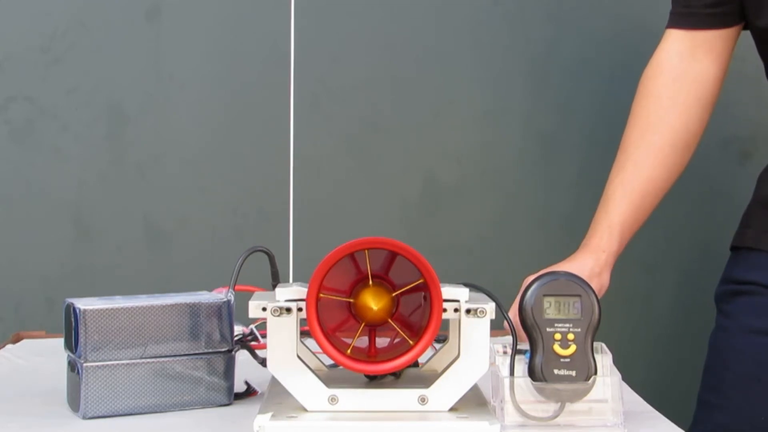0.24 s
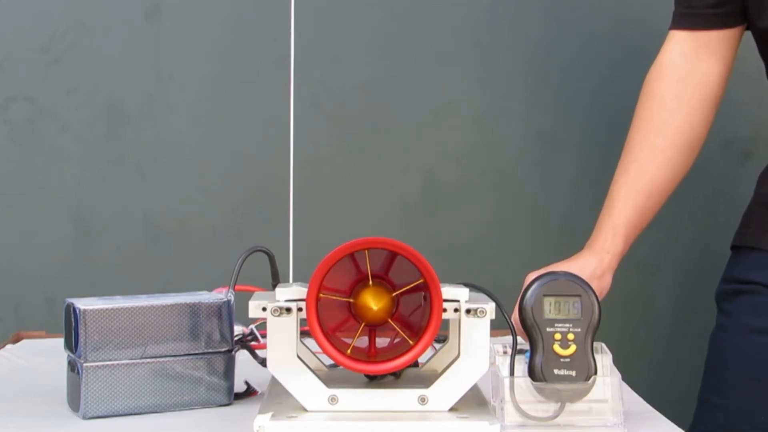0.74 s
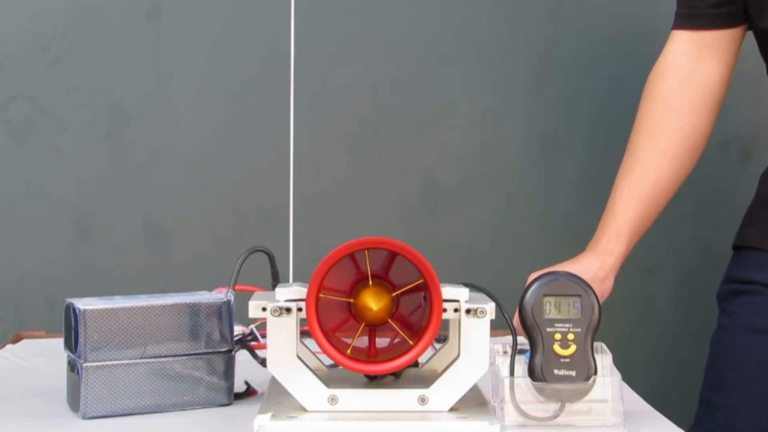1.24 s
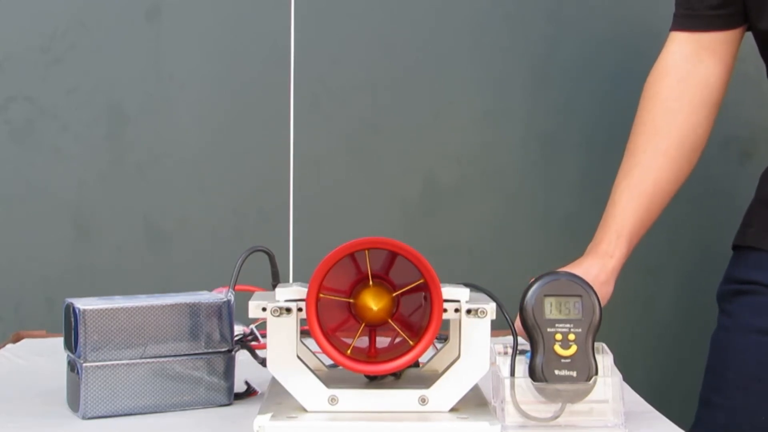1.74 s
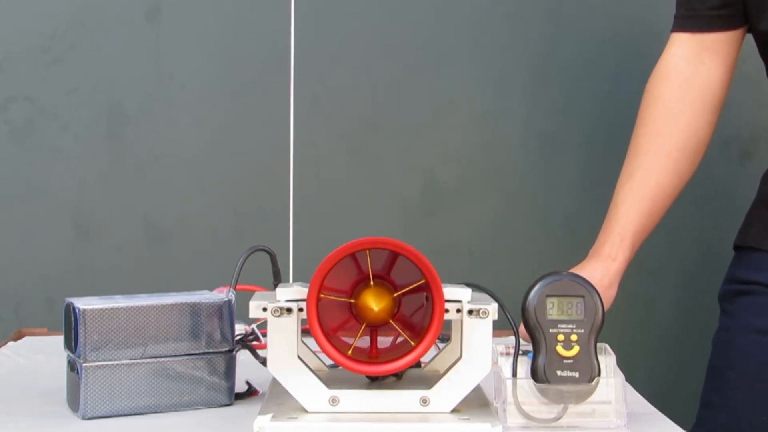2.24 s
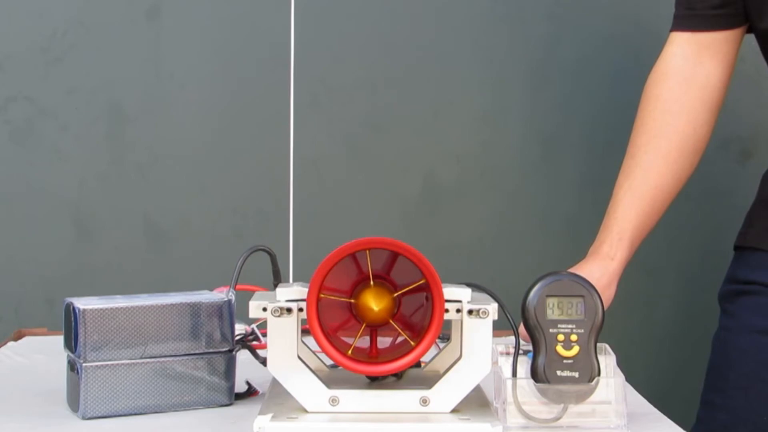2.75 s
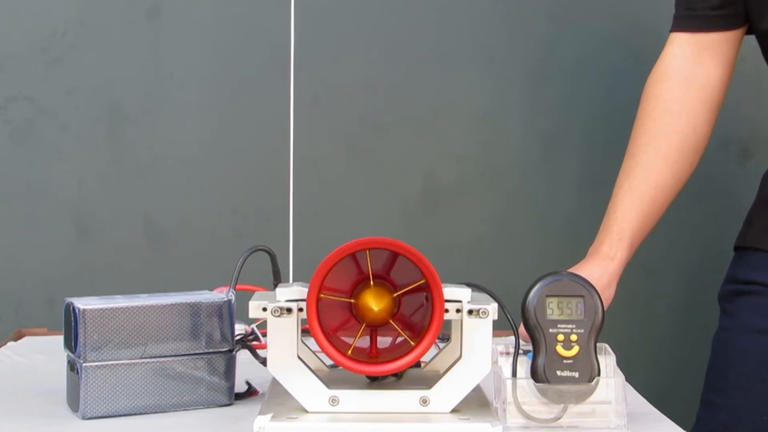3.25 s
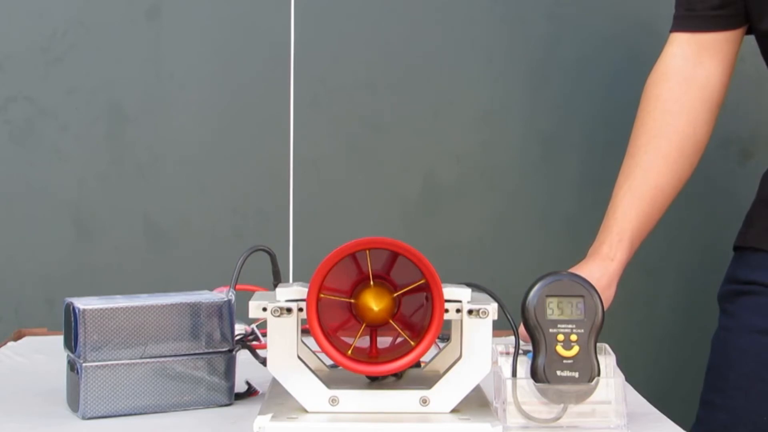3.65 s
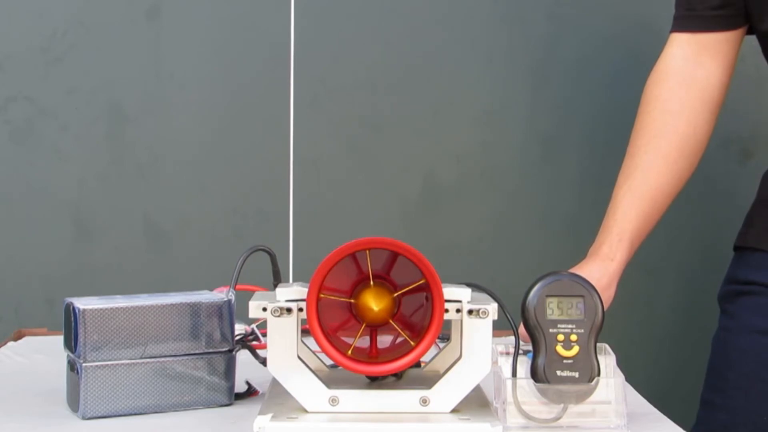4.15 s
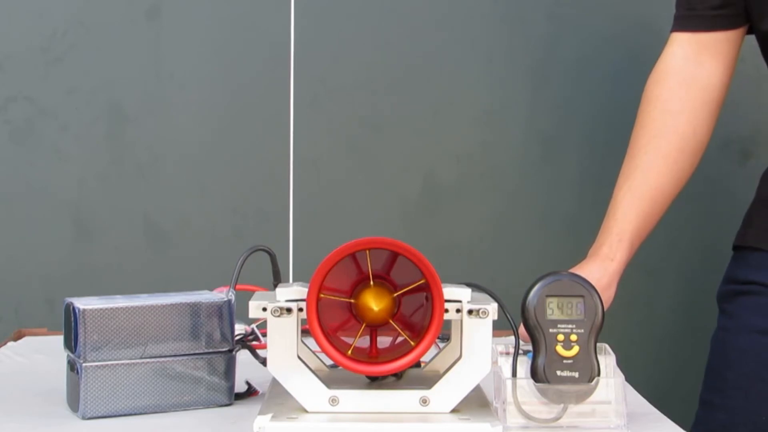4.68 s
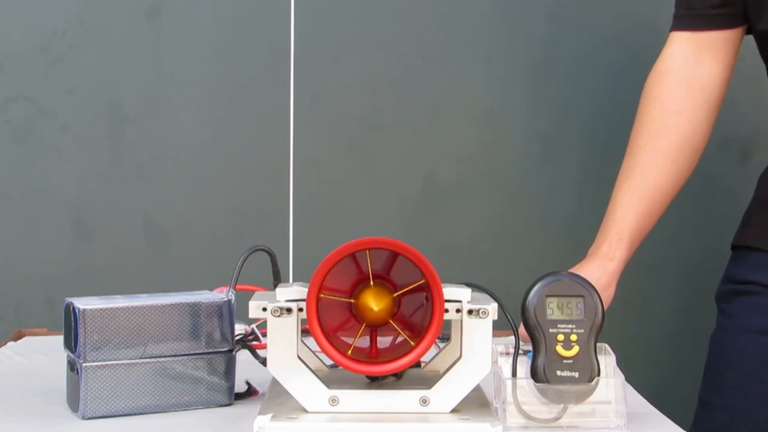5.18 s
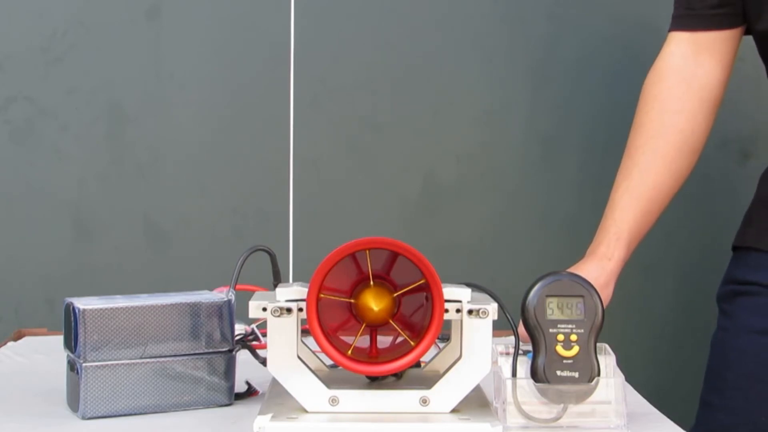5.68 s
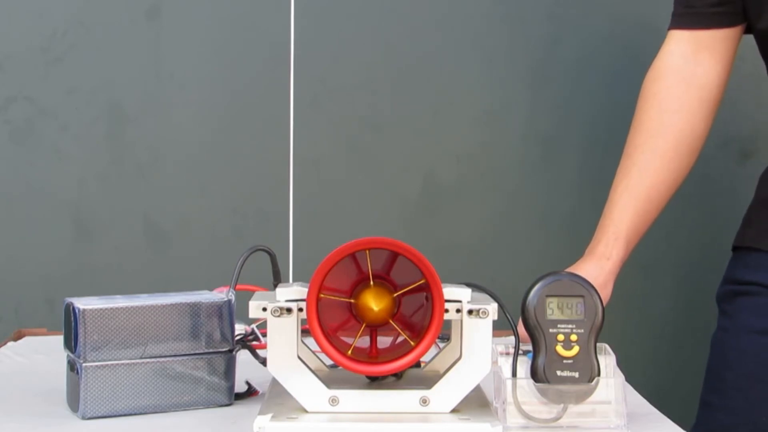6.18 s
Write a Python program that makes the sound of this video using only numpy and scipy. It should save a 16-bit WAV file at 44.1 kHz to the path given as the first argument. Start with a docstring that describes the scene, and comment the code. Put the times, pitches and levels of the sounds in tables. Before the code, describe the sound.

A ducted fan on a bench stand starts with a quiet, sinking whine and soft hissing air. Just after half a second it is throttled up: the whine climbs steeply, a thin controller whistle appears, and the air roar swells. From about two seconds it holds a shrill, very slightly sagging tone that swells and fades to the end. Close stereo microphone in a small, lively room.

```python
"""A whine sinks, climbs steeply and holds high over rushing air: a twelve-blade electric ducted fan on a
test stand coasts down, is throttled up and held at full power. One shaft speed drives blade harmonics,
shaft orders, stand resonances and the level and colour of filtered-noise air. The speed controller whistles.
Room echoes make the gliding tones flutter; the held whine swells and fades in the moving air."""
import sys
import numpy as np
from scipy import signal
from scipy.fft import rfft, irfft, next_fast_len
from scipy.io import wavfile
from scipy.ndimage import uniform_filter1d

SR = 44100
rng = np.random.default_rng(int(sys.argv[2]) if len(sys.argv) > 2 else 0)


def bounce(signal):
    """Save signal as a 16-bit WAV file at the path given by the first command-line argument."""
    frames = np.transpose(np.atleast_2d(signal))
    limited = np.clip(frames, -1, 1)
    pcm = np.round(limited * 32767).astype(np.int16)
    wavfile.write(sys.argv[1], SR, pcm)


N = 283116
TIME = np.arange(N) / SR
BLADE_COUNT = 12


def amp(db):
    """Decibels to gain."""
    return 10 ** (np.asarray(db) / 20)


def evened(x):
    """Scales to rms 1."""
    return x / np.sqrt(np.mean(abs(x) ** 2) + 1e-20)


def follow(rows, t=TIME):
    """Columns of a curve table, interpolated at the times t."""
    s, *columns = np.transpose(rows)
    return [np.interp(t, s, c) for c in columns]


def read(points, hz):
    """Spectrum table interpolated on a log-frequency axis."""
    f, value = np.transpose(points)
    return np.interp(np.log(hz + 1), np.log(f + 1), value)


def resonance(hz, centre_hz, width_hz):
    """Bell-shaped response, 1 at the centre and 1/2 at half the width to either side."""
    return 1 / (1 + (2 * (hz - centre_hz) / width_hz) ** 2)


def bumps(rows, hz):
    """Summed dB of bell-shaped peaks or dips."""
    return sum(db * resonance(hz, f, width) for f, width, db in rows)


def wander(rate_hz, slope=2):
    """Complex random drift of rms 1 that falls off above the given rate."""
    size = next_fast_len(N, real=True)
    hz = np.fft.rfftfreq(size, 1 / SR)
    spectrum = rfft(rng.standard_normal((2, size)))
    lowpass = 1 / np.sqrt(1 + (hz / rate_hz) ** (2 * slope))
    a, b = irfft(spectrum * lowpass, size)[:, :N]
    return evened(a + 1j * b)


def eddies(rate_hz, apart, slope=2):
    """Drift at two microphones: a shared part plus each one's own, weighted by apart."""
    own = np.array([wander(rate_hz, slope), wander(rate_hz, slope)])
    return evened(wander(rate_hz, slope) + apart * own)


def tone(turns, db, drift=1):
    """Sine of the given rms level before a complex drift shakes it."""
    return np.sqrt(2) * amp(db) * (drift * np.exp(2j * np.pi * turns)).real


# DRAG_PER_TURN: share of the speed lost to air drag in each turn
COAST_RPS, DRAG_PER_TURN = 261, .00713
# full-power battery sag: quick drop with its time constant, then steady loss
SAG_RPS, SAG_S, DRAIN_RPS_PER_S = 3.25, .33, 1.6
# throttle opening, before smoothing: (time [s], shaft speed [turns/s])
SPIN_UP_RPS = [(.6, 124.5), (.65, 131), (.7, 151), (.8, 215.9), (.91, 307), (1, 363.5), (1.1, 406.4),
               (1.3, 482), (1.5, 528), (1.9, 620), (2.02, 673), (2.11, 697.3)]


def shaft_speed():
    """Turns per second: drag slows the rotor, the throttle winds it up, the battery sags under load."""
    coasting = COAST_RPS / (1 + DRAG_PER_TURN * COAST_RPS * TIME)
    loaded_s = np.maximum(TIME - SPIN_UP_RPS[-1][0], 0)
    sag_rps = SAG_RPS * (1 - np.exp(-loaded_s / SAG_S)) + DRAIN_RPS_PER_S * loaded_s
    driven = follow(SPIN_UP_RPS)[0] - sag_rps
    return uniform_filter1d(np.maximum(coasting, driven), size=1400, mode="nearest")


KNEE_RPS, RUSH_DB_PER_RPS = 358, .078
SURGE_AT_S, SURGE_RISE_S, SURGE_FALL_S, SURGE_DB = 1.81, 0.12, 1.16, 2.5


def airflow(shaft_hz):
    """Flow in dB re steady full power: rises with speed up to a knee, surges once at the throttle stop."""
    since = np.maximum(TIME - SURGE_AT_S, 0)
    fall = np.exp(-np.maximum(since - SURGE_RISE_S, 0) / SURGE_FALL_S)
    surge = np.minimum(since / SURGE_RISE_S, 1) * fall
    return RUSH_DB_PER_RPS * np.minimum(shaft_hz - KNEE_RPS, 0) + SURGE_DB * surge


# blade harmonics 1 to 8, before duct lift: (level above the knee [dB], gain per dB of flow [dB/dB])
BLADE_HARMONICS = [(-21, 1.45), (-17.5, 1.6), (-19, 1.5), (-26, 1.5), (-27, 1.4), (-37, 1.15), (-34, 1.15),
                   (-41, 1.05)]
# duct and stand resonances, unscaled: (frequency [Hz], width [Hz], lift [dB])
DUCT_RESONANCES = [(208, 39, 4.5), (590, 28, 1.5), (704, 62, 6), (980, 82, 3), (1280, 120, 2),
                   (1404, 63, 9), (1744, 30, 3.5), (2416, 58, 4.5), (2707, 195, 4)]


def gliding_whine(turns, shaft_hz, flow_db, coloured=.9):
    """Blade harmonics grow with flow and swell at duct resonances; turbulence makes each tremble."""
    out = np.zeros((2, N))
    for k, (db, growth) in enumerate(BLADE_HARMONICS, 1):
        order = k * BLADE_COUNT
        lift_db = coloured * bumps(DUCT_RESONANCES, order * shaft_hz)
        level_db = db + growth * np.minimum(flow_db, 0) + lift_db
        tremble = .25 * eddies(90, .5, slope=1.4)
        audible = order * shaft_hz < SR / 2
        out += audible * tone(order * turns, level_db, 1 + tremble)
    return out


# full-power whine, before trim and fading: (time [s], level [dB], left minus right [dB])
HELD_WHINE = [(2.1, -18, 5), (2.16, -21.5, 0.0), (2.28, -21.5, 2.5), (2.33, -25.5, 13), (2.41, -16.5, 4),
              (2.58, -20, 3.0), (2.64, -25, 9), (2.69, -17.5, 3), (2.76, -25, 0.0), (2.8, -17.5, -0.5),
              (2.93, -18, 2.0), (3.01, -22, -0.5), (3.12, -15.5, -2), (3.29, -16.5, -1.0),
              (3.41, -17.5, -6.5), (3.61, -22.5, -9), (3.7, -26.5, -3), (3.75, -22.5, -13),
              (3.84, -20.5, 0.0), (3.95, -28.5, -7), (4.0, -21, -3), (4.44, -19.5, 0.5), (4.65, -16, -1),
              (4.83, -23, 2.5), (4.88, -18.5, 3), (5.5, -17, -1.5), (5.88, -16.5, 1.0), (5.95, -20, 0.0),
              (6.07, -15, -1), (6.22, -17.5, 0), (6.27, -23, -0.5), (6.42, -16, -2.0)]


def held_whine(turns, trim_db=2, fray=0.24, spread=1.0, lag_rad=0.1):
    """Blade tone at full power: swells, fades at random, trembles, sits in a narrow noise skirt."""
    db, pan_db = follow(HELD_WHINE)
    sides = np.array([[1], [-1]])
    fading = .2 * eddies(12, .9) + .14 * eddies(35, .9)
    # slightly out of phase at the two microphones
    drift = np.exp(1j * lag_rad * sides) * (1 + fading)
    blade_turns = BLADE_COUNT * turns
    core = tone(blade_turns, db + trim_db + spread * sides * pan_db / 2, drift)
    skirt = tone(blade_turns, np.median(db) + trim_db, fray * eddies(96, 1.0, slope=1.25))
    return core + skirt


CONVERTER_HZ = 48000
FOLD_CENTRE_HZ, FOLD_WIDTH_HZ = 4200, 3400  # band that passes best
# folded blade harmonics, before flow, band and flutter: (harmonic number, level [dB])
FOLDED_HARMONICS = [(5, -39), (6, -35), (7, -35)]


def folded_whine(turns, shaft_hz, flow_db, flutter=0.47):
    """Faint whistles: ultrasonic blade harmonics mirrored by the converter, at |rate - harmonic|."""
    out = np.zeros((2, N))
    for k, db in FOLDED_HARMONICS:
        order = k * BLADE_COUNT
        mirrored_hz = abs(CONVERTER_HZ - order * shaft_hz)
        passed = resonance(mirrored_hz, FOLD_CENTRE_HZ, FOLD_WIDTH_HZ)
        drift = 0.74 + flutter * eddies(6, 0.46)
        out += passed * tone(CONVERTER_HZ * TIME - order * turns, db + flow_db, drift)
    return out


RUSH_DB = -27.8  # before flow and flicker
# rush colour, idling: (frequency [Hz], density [dB per Hz])
IDLE_COLOUR = [(25, -20), (100, -13.5), (170, -15.5), (300, -11), (1150, -6.5), (1330, -4), (2400, 5),
               (3500, -0.5), (4300, -3.5), (6500, -3), (9000, -8), (15000, -3)]
# rush colour, full power: (frequency [Hz], density [dB per Hz])
FULL_COLOUR = [(25, -24), (70, -15.5), (150, -4.5), (220, -4), (300, -6.5), (500, -4), (1100, -4.5),
               (1800, -0.5), (2700, 0), (3500, 0), (5000, -2), (7300, -3.5), (9500, -5), (15000, -5.5)]
# jet swirl in the room, out of step at the two microphones: (frequency [Hz], level re rush [dB])
JET_SWIRL = [(30, 2), (80, 9), (150, 2.5), (320, 6.5), (500, 4.5), (700, 4), (1150, 2.5), (1700, -2.5),
             (2500, -5.5), (3400, -5), (5000, -7.5), (10000, -8), (14000, -15)]


def rush(speed, flow_db, patchy_db=1, flicker_db=0.54, calm_db=-13, right_db=0.24):
    """Turbulent air coloured by the duct; with speed it fills out in the bass and swirls wide."""
    frames, hz = N // 512 + 5, np.fft.rfftfreq(2048, 1 / SR)
    frame_speed = np.interp(np.arange(frames) * 512 / SR, TIME, speed)[:, None]
    a, b, c, d, patches = rng.standard_normal((5, frames, len(hz)))
    power = np.clip((frame_speed - .3) / 0.66, 0, 1)
    air_db = (1 - power) * read(IDLE_COLOUR, hz) + power * read(FULL_COLOUR, hz)
    duct = amp(air_db + bumps(DUCT_RESONANCES, hz))
    # the jet stirs the room only once it has some force
    stirred = np.clip((frame_speed - .32) / .33, 0, 1)
    swirl = amp(air_db + (1 - stirred) * calm_db + stirred * read(JET_SWIRL, hz))
    # level each frame by its mid-band energy
    body = (hz > 900) & (hz < 2900)
    size = np.sqrt((duct[:, body] ** 2).sum(1, keepdims=True))
    patches = uniform_filter1d(patches, size=7, axis=0)
    patches = evened(uniform_filter1d(patches, size=25, axis=1))
    noise = np.array([duct * (a + 1j * b), swirl * (c + 1j * d)])
    z = noise * amp(patchy_db * patches) / size
    mid, side = signal.istft(z.transpose(0, 2, 1), nperseg=2048, noverlap=1536)[1][:, :N]
    air = np.array([(mid + side) / amp(right_db), (mid - side) * amp(right_db)])
    flicker = flicker_db * evened(wander(17).real)
    return air * np.sqrt(2) * amp(RUSH_DB + flow_db + flicker)


# part-throttle whistle, before shake: (time [s], frequency [Hz], level [dB], sideband level [dB])
CONTROLLER_WHISTLE = [(0, 7900, -56, -70), (.6, 7725, -51, -68), (.68, 7730, -34, -60),
                      (.87, 7650, -32.5, -48), (1.08, 7510, -31.5, -32), (1.2, 7500, -38, -33),
                      (1.45, 7480, -37, -47), (2, 7500, -60, -70)]
# shaft-rotation sidebands above it: (multiple of shaft speed, level re sideband level [dB])
WHISTLE_SIDEBANDS = [(6, -9), (7, -7), (8, -6), (9, -7), (10, -3), (11, -8), (12, -6), (13, -9)]


def controller(turns):
    """Speed controller's thin whistle; the shaft's rotation throws sidebands above it."""
    hz, db, sidebands_db = follow(CONTROLLER_WHISTLE)
    switching = np.cumsum(hz) / SR
    out = tone(switching, db, 1 + 0.45 * eddies(25, 0.67))
    for order, side_db in WHISTLE_SIDEBANDS:
        drift = 1.1 + .5 * eddies(20, 0.65)
        out = out + tone(switching + order * turns, sidebands_db + side_db, drift)
    return out


RING_LAG_S = .008  # build-up delay of a resonance
# orders meeting stand and housing resonances, before trim and shake:
# (multiple of shaft speed, frequency [Hz], width [Hz], level [dB])
PASSING_ORDERS = [(1, 440, 170, -42), (2, 460, 70, -56), (2, 695, 130, -40), (2, 930, 380, -44),
                  (3, 700, 170, -53), (6, 3375, 110, -27), (9, 5740, 240, -35), (10, 1300, 260, -54),
                  (10, 6330, 180, -24), (11, 6950, 240, -29), (20, 3150, 210, -27.5),
                  (32.4, 15200, 2100, -16)]


def housing(turns, shaft_hz, shake=.25, trim_db=.5):
    """Stand and housing sing when a shaft order meets a resonance, a moment after it arrives."""
    drift = 1 + shake * eddies(14, 1.0)
    felt_hz = np.interp(TIME - RING_LAG_S, TIME, shaft_hz)
    out = 0
    for order, hz, width, db in PASSING_ORDERS:
        nearness = resonance(order * felt_hz, hz, width) ** 2
        out = out + nearness * tone(order * turns, db + trim_db, drift)
    return out


DRONE_START_S, DRONE_LENGTH_S, DRONE_HZ, DRONE_DB = .75, 1.1, 577, -43  # dB at the peak of the arch


def stand():
    """Uneven drone of the stand: swells and dies away during the spin-up."""
    arch = np.sin(np.pi * np.clip((TIME - DRONE_START_S) / DRONE_LENGTH_S, 0, 1))
    return np.sqrt(abs(arch)) * tone(DRONE_HZ * TIME, DRONE_DB, eddies(5.7, 0.45))


# unbalance, unequal blades, bearing tone; at top speed, before wavering:
# (multiple of shaft speed, level [dB])
SHAFT_ORDERS = [(1, -36.5), (2, -41), (3, -45), (4, -37), (5, -40.5), (8, -42.5), (9, -67), (10, -40),
                (11, -38), (13, -54), (14, -40), (16, -50), (17.65, -43), (20, -50)]


def shaft_hum(turns, speed, rise_db=55):
    """Shaft orders that waver slowly and stand out of the rush only near full speed."""
    out = 0
    for order, db in SHAFT_ORDERS:
        wavering = 1 + .14 * eddies(4, .6)
        out = out + tone(order * turns, db - rise_db * (1 - speed) ** 0.85, wavering)
    return out


ROOM_HUM_HZ, ROOM_HUM_DB = 178, -66


def room_hum():
    """Faint hum of fixed pitch in the room, shaken by slow drift."""
    return tone(ROOM_HUM_HZ * TIME, ROOM_HUM_DB, wander(10))


# reverberation: (frequency [Hz], T60 [s])
ROOM_T60 = [(200, 0.36), (3000, 0.19), (8000, 0.29), (15000, 0.095)]


def room(x, wet_db=-6, early_db=-3, apart=0.62, count=8):
    """Direct sound, a few echoes from table and wall, and a tail whose bands die at their own speeds."""
    shape = (3, SR // 2)
    taps = rng.standard_normal(shape) * (rng.random(shape) < 2000 / SR)
    hz, t, z = signal.stft(taps[0] + apart * taps[1:], SR, nperseg=256)
    decay = amp(-60 * t / read(ROOM_T60, hz)[:, None])
    tail = signal.istft(z * decay, SR, nperseg=256)[1]
    response = amp(wet_db) * tail / np.linalg.norm(tail[0])
    response[:, 0] += 1
    delays = (rng.uniform(.004, .028, count) * SR).astype(int)
    echoes = rng.choice([-1, 1], count) + apart * rng.standard_normal((2, count))
    response[:, delays] += amp(early_db) / np.sqrt(count) * echoes
    response /= np.linalg.norm(response, axis=1, keepdims=True)
    return signal.fftconvolve(x, response, axes=1)[:, :N]


SETTLE_AT_S, SETTLE_S = 2.07, 0.076  # crossfade from gliding to held whine
UNLOADED_DB = -2  # motor-off rush offset at the start, shrinking to 0 as the throttle opens
LEAST_FLOW_DB = -16.5  # floor from air still moving in the room, re full power


def scene():
    """One shaft speed drives tones and air; once it settles, echoes no longer beat against the whine."""
    shaft_hz = shaft_speed()
    turns = np.cumsum(shaft_hz + 0.0948 * wander(4.74).real) / SR
    speed, flow_db = shaft_hz / shaft_hz.max(), airflow(shaft_hz)
    settled = np.clip((TIME - SETTLE_AT_S) / SETTLE_S, 0, 1)
    gliding = room(np.sqrt(1 - settled) * gliding_whine(turns, shaft_hz, flow_db))
    held = np.sqrt(settled) * held_whine(turns)
    whine = gliding + held + folded_whine(turns, shaft_hz, flow_db)
    unloaded = np.clip(1 - TIME / SPIN_UP_RPS[0][0], 0, 1)
    air = rush(speed, np.maximum(flow_db + UNLOADED_DB * unloaded, LEAST_FLOW_DB))
    machine = controller(turns) + housing(turns, shaft_hz) + stand() + shaft_hum(turns, speed)
    return whine + air + machine + room_hum()


EDGE_HZ = 15600
# microphone notches: (frequency [Hz], width [Hz], depth [dB])
MIC_NOTCHES = [(3950, 330, -10), (7865, 120, -14)]
# microphone treble fall: (frequency [Hz], level [dB])
MIC_TREBLE = [(12000, -0.5), (13000, -3), (14000, -7), (15000, -22), (16000, -26)]


def record(dry):
    """Microphone's two notches and dull top, then the band limit."""
    hz = np.fft.rfftfreq(N, 1 / SR)
    heard = irfft(rfft(dry) * amp(bumps(MIC_NOTCHES, hz) + read(MIC_TREBLE, hz)), N)
    band_limit = signal.firwin(511, EDGE_HZ, window=("kaiser", 9), fs=SR)
    return signal.oaconvolve(heard, band_limit[None], "same")


dry = scene()
out = record(dry)
bounce(out)
```